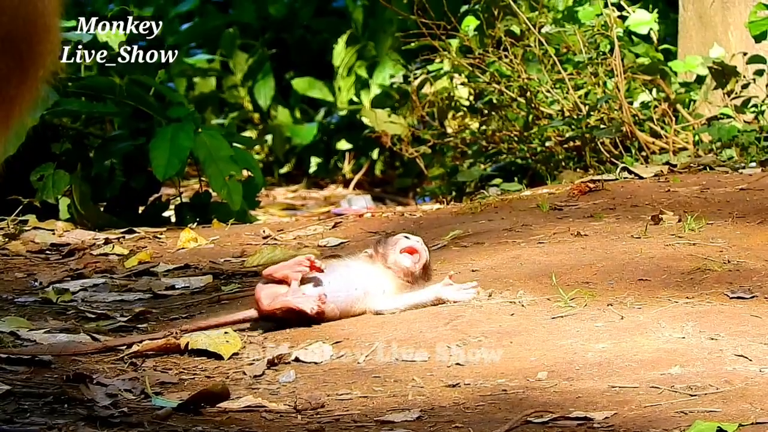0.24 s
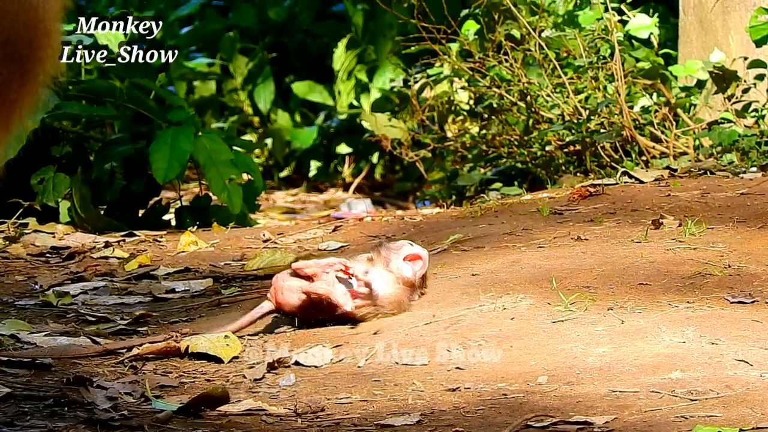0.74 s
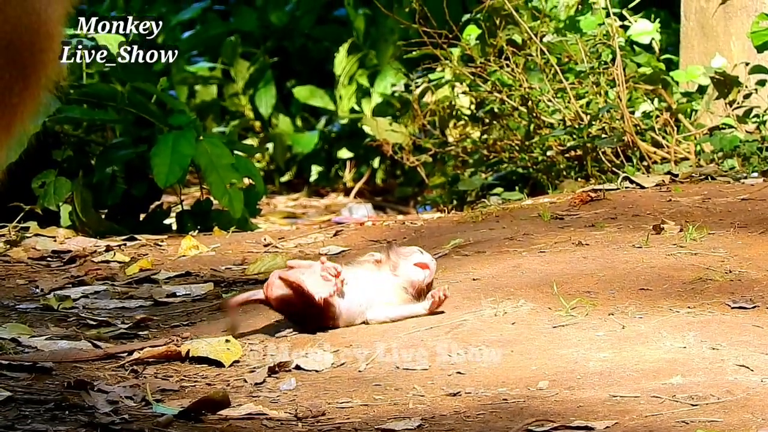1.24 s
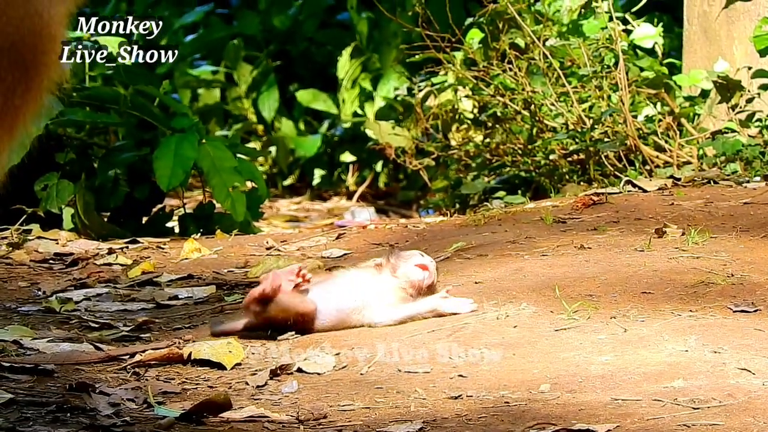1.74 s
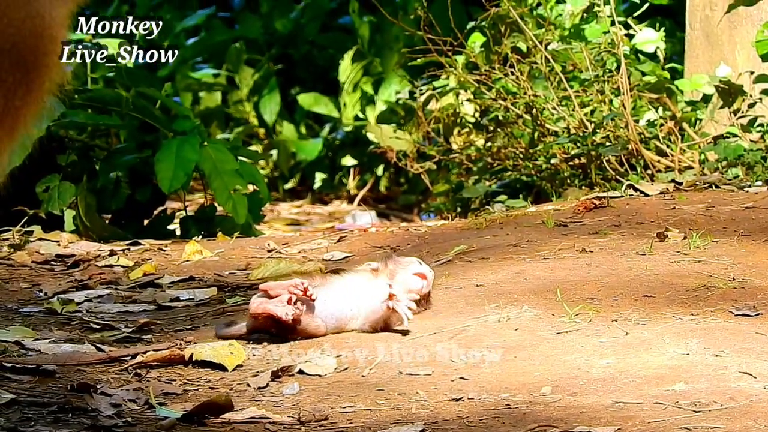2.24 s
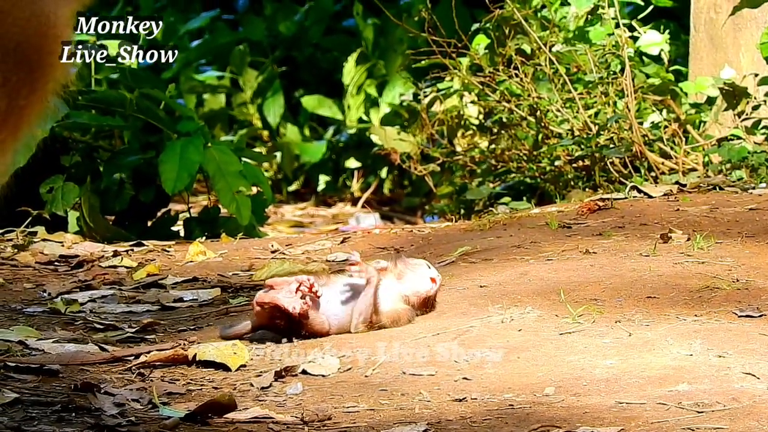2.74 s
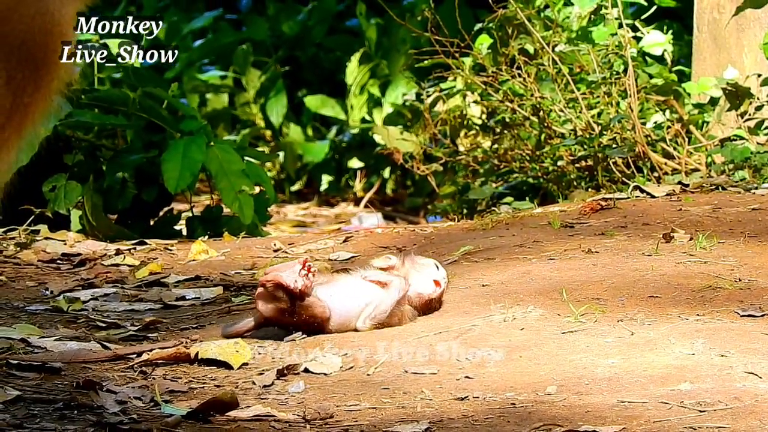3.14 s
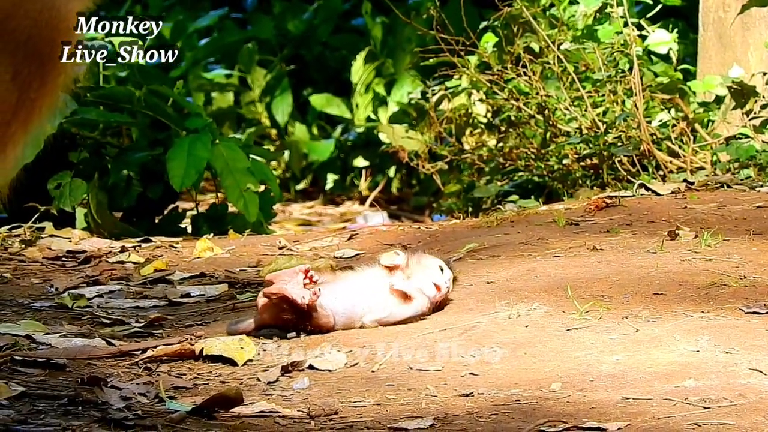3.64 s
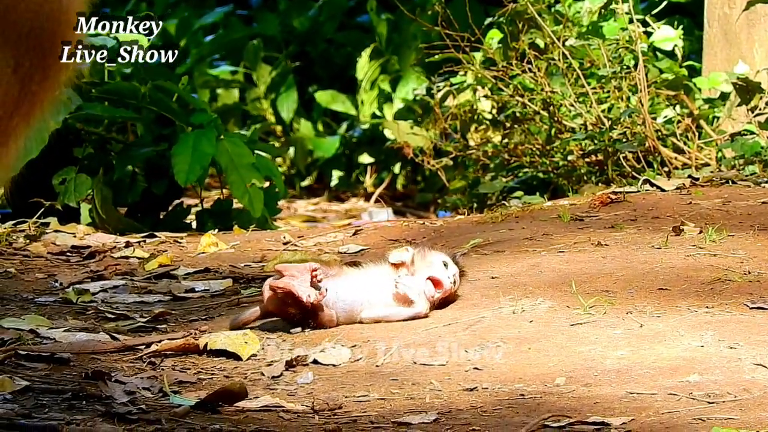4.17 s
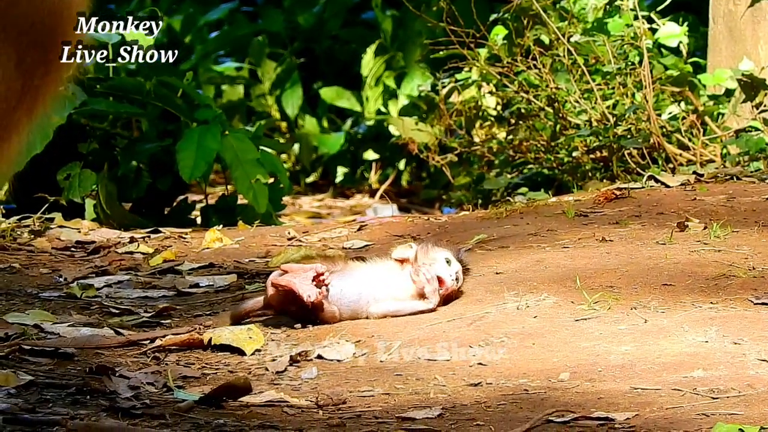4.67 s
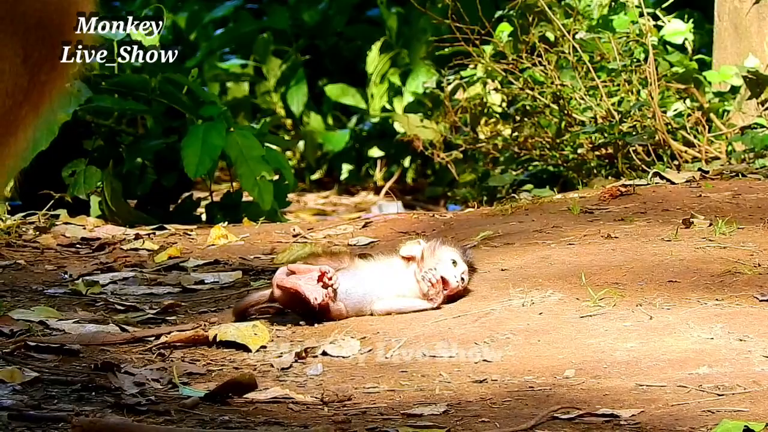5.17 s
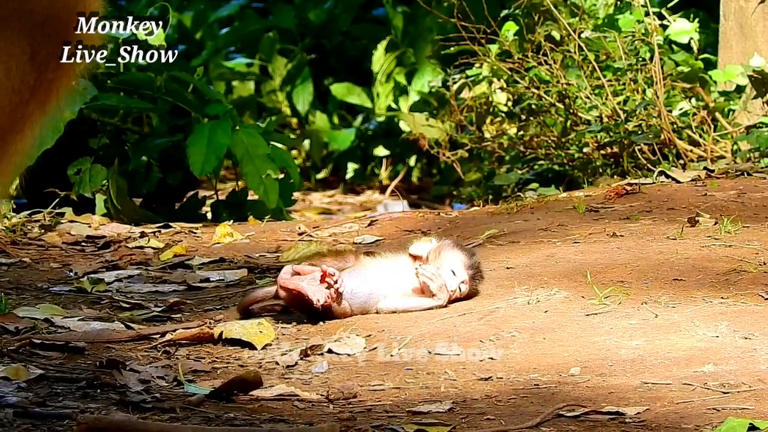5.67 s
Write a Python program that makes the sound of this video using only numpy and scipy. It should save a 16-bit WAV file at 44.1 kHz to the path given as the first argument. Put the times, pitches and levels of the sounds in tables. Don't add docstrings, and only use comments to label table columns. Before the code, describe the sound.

Outdoors by bushes, a small monkey ends one cry, pauses while another coos softly, then gives short barks and five or so piercing screams in quick succession. Each starts low and hoarse, leaps to a whistle and tears into a harsh screech, some ending on a falling note. Scuffs, snaps, low wind and hissing leaves lie beneath. The stereo microphone hears a ringing tree echo, with softened top treble and background dipping under loud cries.

```python
import sys
import numpy as np
from scipy import signal
from scipy.fft import rfft, irfft
from scipy.io import wavfile
from scipy.ndimage import uniform_filter1d

SR = 44100
rng = np.random.default_rng(int(sys.argv[2]) if len(sys.argv) > 2 else 0)


def dump(signal):
    limited = np.clip(np.atleast_2d(signal).T, -1, 1)
    pcm = np.round(limited * 32767).astype(np.int16)
    wavfile.write(sys.argv[1], SR, pcm)


def ratio_of_db(decibels):
    return 10 ** (np.asarray(decibels, float) / 20)


N = 260631


def evened(x):
    return x / np.sqrt(np.mean(x ** 2) + 1e-20)


def read(points, hz):
    f, value = np.transpose(points)
    return np.interp(np.log(hz + 1), np.log(f + 1), value)


def add(mix, s, sound):
    part = mix[round(s * SR):][:len(sound)]
    part += sound[:len(part)]


def played(rows, fade=0.0011):
    s, *columns = np.transpose(rows)
    t = np.arange(s[0], s[-1], 1 / SR)
    since_start = t - s[0] + (s[0] == 0)
    edge = np.clip(np.minimum(since_start, s[-1] - t) / fade, 0, 1)
    return t, [np.interp(t, s, c) for c in columns], edge


def wobble(length, hz):
    noise = rng.standard_normal(length + 2000)
    return evened(signal.lfilter(*signal.butter(2, hz, fs=SR), noise)[2000:])


def resonate(x, hz, width):
    turn = np.exp(2j * np.pi * np.cumsum(hz * np.ones(len(x))) / SR)
    r = np.exp(-np.pi * width / SR)
    return 2 * (turn * signal.lfilter([(1 - r) ** 2], [1, -2 * r, r * r], x / turn)).real


def coloured(x, points):
    return irfft(rfft(x) * ratio_of_db(read(points, np.fft.rfftfreq(N, 1 / SR))), N)


def voiced(rows, throat, order, tilt_db, jitter_hz, shimmer_db, air_db=-40, dips=(), fade=0.0012):
    t, (hz, level_db), edge = played(rows, fade)
    hz = uniform_filter1d(hz, 400, mode="nearest")
    hz = hz * (1 - sum(drop * np.exp(-.5 * ((t - s) / width) ** 2) for s, drop, width in dips))
    turns = np.cumsum(hz + jitter_hz * wobble(len(t), 290)) / SR
    k = np.arange(1, 13)[:, None]
    slope_db = np.minimum(tilt_db, 9)
    share_db = read(throat, k * hz) - read(throat, order * hz) + slope_db * np.log2(k / order)
    harmonics = ratio_of_db(share_db) * (k * hz < 16000) * np.cos(2 * np.pi * k * turns)
    leak = ratio_of_db(air_db) * evened(resonate(rng.standard_normal(len(t)), 0.897 * hz, 1100))
    loudness = np.sqrt(2) * ratio_of_db(level_db + shimmer_db * wobble(len(t), 100))
    return t[0], loudness * edge * (harmonics.sum(0) + leak)


NOTE_PEAK, NOTE_START_DB, NOTE_END_DB = 0.34, -7, -9


def note(start, length, first_hz, last_hz, db, arch):
    u = np.linspace(0, 1, num=20)
    hz = (first_hz + (last_hz - first_hz) * u) * (1 + arch * np.sin(np.pi * u))
    return np.c_[start + length * u, hz, db + np.interp(u, [0, NOTE_PEAK, 1], [NOTE_START_DB, 0, NOTE_END_DB])]


LEAD_S, LEAD_FULL_HZ, LEAD_GONE_HZ = .016, 2400, 2700


def ahead(x):
    hz = np.fft.rfftfreq(N, 1 / SR)
    lead = LEAD_S * np.clip((LEAD_GONE_HZ - hz) / (LEAD_GONE_HZ - LEAD_FULL_HZ), 0, 1)
    return irfft(rfft(x) * np.exp(2j * np.pi * np.cumsum(lead) * hz[1]), N)


def low(rows):
    return rows + [LEAD_S, 0, 0]


def young_one():
    return ahead(whistling() + clean_notes() + chest_voice() + screeching())


KNEE_HZ = 5490
CREEP_HZ_PER_S, WAVER_HZ, DROOP_HZ, DROOP_S = 4200, 54.6, 260, 0.0046
BURST_DB, BURST_S = 6.5, 0.037


def whistle(start, end, top_hz, settle_s, db):
    t = np.linspace(start, end, num=40)
    aim_hz = top_hz - CREEP_HZ_PER_S * (end - t)
    hz = aim_hz - (aim_hz[0] - KNEE_HZ) * np.exp(-(t - start) / settle_s)
    hz -= DROOP_HZ * np.exp((t - end) / DROOP_S)
    waver = wobble(SR // 4, 24)[((t - start) * SR).astype(int)]
    hz += WAVER_HZ * waver * np.minimum((t - start) / settle_s, 1)
    return np.c_[t, hz, db + BURST_DB * np.exp(-(t - start) / BURST_S)]


LEAP_HZ, LEAP_BEND = 2490, 1.3
# f/Hz, level/dB
CLIMB_GAIN = [(1100, -15.5), (1800, -7), (2450, -1), (3000, -6), (4100, 3.5), (5600, -6.5)]


def climb(start, leap, knee, first_hz, db):
    t = np.linspace(start, knee, num=40)
    shot = 1 - np.clip((knee - t) / (knee - leap), 0, 1) ** LEAP_BEND
    hz = np.interp(t, [start, leap], [first_hz, LEAP_HZ]) + (KNEE_HZ - LEAP_HZ) * shot
    return np.c_[t, hz, db + read(CLIMB_GAIN, hz)]


def joined(tables):
    out = [list(tables[0])]
    for rows in tables[1:]:
        if rows[0][0] - out[-1][-1][0] < .002:
            out[-1] = out[-1] + list(rows)
        else:
            out.append(list(rows))
    return out


# start t/s, end t/s, top f/Hz, settling t/s, level/dB
WHISTLES = [
    (0, 0.106, 6150, 0.006, -32.5),
    (2.08, 2.217, 6930, 0.012, -39),
    (2.889, 2.914, 7400, 0.04, -39),
    (3.355, 3.396, 6560, 0.014, -32.5),
    (3.413, 3.553, 7660, 0.00092, -39),
    (4.152, 4.307, 7600, 0.03, -34.5),
    (4.966, 5.146, 7540, 0.065, -40),
    (5.678, 5.926, 7540, 0.035, -35),
]
# start t/s, leap t/s, knee t/s, start f/Hz, level/dB
CLIMBS = [
    (3.275, 3.327, 3.355, 1740, -19),
    (4.085, 4.107, 4.152, 1498, -21.5),
    (4.9, 4.929, 4.966, 1601, -20.5),
    (5.609, 5.644, 5.677, 1101, -26),
]
# start t/s, length t/s, first f/Hz, last f/Hz, level/dB
SQUEAKS = [
    (2.213, 0.062, 7030, 7180, -39),
    (2.836, 0.0285, 3473, 3940, -21.5),
    (3.745, .025, 2557, 2320, -25.5),
    (5.312, 0.04, 2960, 2820, -29.5),
]
# f/Hz, level/dB
THROAT = [(500, -1.5), (900, -6), (1500, 13), (2200, 5), (3000, 5), (4200, -6.5), (5500, -15.5),
          (7500, -35), (10000, -42.5), (14000, -64)]


def whistling():
    out = np.zeros(N)
    arches = [whistle(*row) for row in WHISTLES] + [climb(*row) for row in CLIMBS]
    arches = sorted(arches, key=lambda rows: rows[0, 0])
    for rows in joined(arches) + [note(*row, arch=0.06) for row in SQUEAKS]:
        add(out, *voiced(rows, THROAT, order=1, tilt_db=-7, jitter_hz=50, shimmer_db=3.0, air_db=-15))
    return out


def outburst(start, length, db, first_hz, last_hz):
    t = np.linspace(0, length, num=40)
    attack_s = 0.032
    effort_db = db - 11 * np.clip(1 - t / attack_s, 0, 1) - 17 * np.maximum(t - attack_s, 0) - 150 * t ** 2
    return with_throat(np.c_[start + t, effort_db, first_hz + (last_hz - first_hz) * t / length])


def with_throat(rows):
    t = rows[:, 0] - rows[0, 0]
    return np.c_[rows, np.interp(t, [0, 0.032, 0.1, 0.22], [-14.5, -40.5, -40.5, 1.5])]


THROAT_EVEN_DB, THROAT_SLOPE = -29.5, 0.26


def opening(start, knee, end, db, mouth_hz, end_db):
    effort_db = db + np.array([-18.5, 0, end_db])
    throat_db = THROAT_SLOPE * (THROAT_EVEN_DB - np.maximum.accumulate(effort_db))
    return np.c_[[start, knee, end], effort_db, mouth_hz * np.ones(3), throat_db]


def rough_pulses(t):
    rate, rough = np.full(len(t), 700.), np.ones(len(t))
    for chest in chest_notes():
        s, hz, _ = np.transpose(chest)
        rate = np.where(t > s[0], np.interp(t, s, hz), rate)
        disorder = [.5, .65] if hz[-1] < hz[0] else [.75, .9]
        rough = np.where(t > s[0], np.interp(t, [s[-1] - .025, s[-1]], disorder), rough)
    phase = np.cumsum(rate * (1 + .075 * rough * wobble(len(t), 200))) / SR % 1
    pulses = (np.diff(phase, prepend=0) < 0) * ratio_of_db(2.0 * rough * wobble(len(t), 300))
    puffs = (.5 + np.exp(-phase / 2.8)) * rng.standard_normal(len(t))
    return (1 - .42 * rough) * evened(pulses) + .42 * rough * evened(puffs), phase, rough


def screech(rows, lips_db=0):
    t, (effort_db, mouth_hz, throat_db), edge = played(rows, fade=0.0038)
    drive, phase, rough = rough_pulses(t)
    mouth = resonate(resonate(drive, mouth_hz, 1600), mouth_hz, 2600)
    fresh = np.exp(-(t - t[0]) / 0.07)
    lips_hz = (1.32 + 0.27 * fresh) * mouth_hz
    mouth += ratio_of_db(lips_db - 11.5 + 5.6 * fresh) * resonate(resonate(drive, lips_hz, 1500), lips_hz, 1600)
    hiss_db = -29.5 + 0.74 * (effort_db + 27.5) + 2.4 * wobble(len(t), 45)
    mouth += ratio_of_db(hiss_db) * 4 * fresh * (1 - fresh) * resonate(drive, 8600, 6000)
    unstable = np.cos(2 * np.pi * np.cumsum(mouth_hz * (1 + .04 * wobble(len(t), 40))) / SR)
    chopped = 1 + 1.14 * np.cos(2 * np.pi * phase)
    squeal = rough * unstable * chopped * ratio_of_db(3.7 * wobble(len(t), 73))
    throat_hz = np.interp(t, [t[0], t[0] + 0.079], [2150, 2450])
    throat = resonate(resonate(drive, throat_hz, 1400), throat_hz, 2100)
    if t[-1] < 5.9:
        edge = edge * np.clip((t[-1] - t) / min(.045, .3 * (t[-1] - t[0])), 0, 1)
    upper = evened(.65 * evened(mouth) + .5 * evened(squeal))
    return t[0], ratio_of_db(effort_db) * edge * (upper - ratio_of_db(np.minimum(throat_db, 16)) * evened(throat))


# t/s, effort level/dB, mouth f/Hz
FIRST_SCREECH = [
    (0.094, -40, 5700),
    (0.119, -23, 5400),
    (0.167, -12.5, 4350),
]
# start t/s, length t/s, effort level/dB, first mouth f/Hz, last mouth f/Hz
SCREECHES = [
    (2.247, 0.2, -16.5, 4332, 3126),
    (3.384, 0.03, -25, 4350, 4300),
    (3.542, 0.22, -17, 4285, 3500),
    (4.295, 0.24, -18.5, 3880, 3700),
    (5.149, 0.089, -16, 3785, 3580),
    (5.89, .025, -16.5, 3950, 3900),
]
# start t/s, knee t/s, end t/s, effort level at the knee/dB, mouth f/Hz
BARKS = [
    (1.376, 1.399, 1.428, -33.5, 3705),
    (1.487, 1.489, 1.56, -36.5, 3800),
    (1.822, 1.859, 1.89, -26.5, 3714),
    (1.93, 1.951, 1.982, -24, 4010),
    (2.779, 2.813, 2.86, -26, 4220),
    (5.548, 5.591, 5.635, -33, 4200),
]
GROWLS = [
    (3.247, 3.261, 3.322, -34, 4370),
    (4.028, 4.067, 4.13, -26.5, 3900),
    (4.861, 4.923, 4.945, -22.5, 3720),
]


def screeching():
    out = np.zeros(N)
    harsh = [opening(*row, end_db=-12.5) for row in BARKS] + [opening(*row, end_db=11) for row in GROWLS]
    for rows in harsh + [with_throat(np.array(FIRST_SCREECH))]:
        add(out, *screech(rows, lips_db=-12))
    for row in SCREECHES:
        add(out, *screech(outburst(*row)))
    return out


# start t/s, length t/s, first f/Hz, last f/Hz, level/dB
GRUNTS = [
    (1.361, 0.058, 717, 764, -33),
    (1.469, 0.044, 840, 866, -42),
    (1.8, 0.06, 700, 963, -35.5),
    (2.767, 0.033, 749, 955, -36.5),
    (3.226, 0.043, 591.6, 924.5, -34.5),
    (3.369, 0.041, 752, 757, -44),
    (4.01, 0.066, 643.3, 970, -39),
    (4.853, 0.039, 693.5, 993, -38),
    (5.529, 0.074, 602, 1026, -36.5),
]
# start t/s, length t/s, first f/Hz, level/dB
BREAKS = [
    (0.09, 0.074, 700, -50),
    (2.23, 0.065, 930.4, -43),
    (3.525, 0.054, 875, -40.5),
    (4.279, 0.058, 873, -40),
    (5.131, 0.06, 827, -43),
    (5.877, 0.049, 904, -42.5),
]


def chest_notes():
    grunts = [note(*row, arch=.13) for row in GRUNTS]
    sag = 4500
    sagging = [note(s, length, hz, hz - sag * length, db, 0.07) for s, length, hz, db in BREAKS]
    return sorted(map(low, grunts + sagging), key=lambda rows: rows[0, 0])


# f/Hz, level/dB
CHEST = [(500, -1.5), (900, -4), (1500, -6), (2200, -3.5), (3000, -17.5), (4300, -10.5), (6000, -29.5),
         (10000, -63)]


def chest_voice():
    out = np.zeros(N)
    for rows in chest_notes():
        add(out, *voiced(rows, CHEST, order=1, tilt_db=-2.5, jitter_hz=36.0, shimmer_db=3.5, fade=0.0092))
    return out


# start t/s, length t/s, first f/Hz, last f/Hz, level/dB
YELPS = [
    (1.911, 0.055, 2207, 2332, -23),
]
WHINES = [
    (1.826, 0.058, 1662, 1640, -30.5),
    (2.77, 0.049, 2154, 2210, -27.5),
    (2.81, 0.036, 2354, 2678, -22),
    (4.025, 0.049, 1790, 2150, -24.5),
    (4.868, 0.059, 1750, 2140, -32.5),
    (5.532, 0.082, 1800, 2110, -33),
]
# t/s, f/Hz, level of the second harmonic/dB
ENDINGS = [
    [(0.152, 1580, -31), (0.157, 1522, -25.5), (0.183, 1410, -29), (0.189, 1230, -42), (0.196, 1148, -41)],
    [(3.68, 2640, -61), (3.705, 2208, -44), (3.726, 1790, -35.5), (3.756, 1615, -36.5), (3.77, 1600, -40)],
    [(4.395, 1950, -35.5), (4.42, 2153, -18), (4.436, 2120, -20), (4.45, 1750, -22.5), (4.466, 1370, -31.5),
     (4.5, 1290, -24.5), (4.522, 1287, -29.5)],
    [(5.215, 2149, -43), (5.227, 2090, -26.5), (5.25, 1700, -22), (5.265, 1519, -21), (5.292, 1480, -29),
     (5.313, 1314, -29)],
]
ENDING_TILTS = [14, -8.5, -3, -1]
ENDING_JITTERS_HZ = [12, 18, 45, 12]
# f/Hz, level/dB
OPEN_THROAT = [(1250, -31), (1600, -19), (2100, -15), (2700, -1), (4300, 1), (5600, -24), (8000, -46),
               (12000, -65)]


def clean_notes():
    out = np.zeros(N)
    for row in YELPS:
        rows = low(note(*row, arch=-0.0194))
        add(out, *voiced(rows, OPEN_THROAT, order=1, tilt_db=-13, jitter_hz=45.4, shimmer_db=4.5, fade=.003))
    for row in WHINES:
        rows = low(note(*row, arch=0.0279))
        add(out, *voiced(rows, OPEN_THROAT, order=1, tilt_db=-25, jitter_hz=70, shimmer_db=4.5, fade=0.0095))
    for rows, tilt_db, jitter_hz in zip(ENDINGS, ENDING_TILTS, ENDING_JITTERS_HZ):
        add(out, *voiced(rows, OPEN_THROAT, order=2, tilt_db=tilt_db, jitter_hz=jitter_hz, shimmer_db=2.5))
    return out


# t/s, peak level/dB, treble against it level/dB
SNAPS = [(2.0807, -40.5, 11), (2.9132, -29, -16), (3.5964, -30, -7), (3.6666, -41, -6),
         (3.748, -39.5, 10.5), (4.088, -60, -17), (4.583, -66.5, -26), (4.933, -47, -19.5),
         (5.201, -53, -25), (5.4177, -46, -5)]


def snaps():
    out, t = np.zeros(N), np.arange(400) / SR
    for s, db, treble_db in SNAPS:
        crack = rng.standard_normal(400) * np.exp(-t / 0.00096)
        add(out, s, ratio_of_db(db + 2.5) * (crack + ratio_of_db(treble_db) * np.diff(crack, prepend=0)))
    return out


# t/s, peak level/dB, centre f/Hz, time to die by 60 dB t/s
SCUFFS = [(0.479, -40.5, 960, 0.03), (0.8, -41, 780, 0.11), (0.823, -41.5, 865, 0.16),
          (0.938, -34.5, 703.5, 0.063), (1.335, -41, 1570, 0.21), (1.545, -37, 1540, 0.083),
          (1.591, -38.5, 1490, 0.042), (1.699, -36, 1610, 0.066), (1.894, -30, 3820, 0.068),
          (2.17, -39.5, 405, 0.13), (2.548, -41, 1800, 0.3), (2.847, -36, 247, 0.066),
          (2.908, -29, 223, 0.057), (3.912, -31.5, 563, 0.087), (4.588, -29.5, 365, 0.11),
          (4.838, -35, 792, 0.16), (5.424, -29.5, 840, 0.06), (5.446, -24, 283, 0.062)]


def scuffs():
    out, t = np.zeros(N), np.arange(5000) / SR
    for s, db, hz, t60 in SCUFFS:
        puff = evened(resonate(rng.standard_normal(len(t)), hz, 0.76 * hz)) + 0.13 * rng.standard_normal(len(t))
        add(out, s, ratio_of_db(db - 3.5 - 60 * t / np.clip(t60, .01, .4)) * np.minimum(t / 0.0016, 1) * puff)
    return out


# t/s, f/Hz, level of the second harmonic/dB
COO = [
    (.51, 376.3, -53.5),
    (.595, 498, -45),
    (.72, 433, -47.5),
    (.765, 455.4, -45),
    (.795, 398, -48.5),
    (.93, 487.7, -47),
    (1.05, 503, -47),
    (1.17, 640, -49),
    (1.255, 577, -57),
]
# t/s, pitch drop as a share 0-1, width t/s
HICCUPS = [
    (.88, 0.19, 0.011),
    (.948, 0.25, .012),
    (1.066, .1, 0.00977),
    (1.133, 0.3, 0.014),
]
# f/Hz, level/dB
COO_THROAT = [(300, -7.5), (500, -0.5), (1000, 3), (1500, -10.5), (2000, -11.5), (2500, -5.5),
              (3300, -11.5), (7000, -42)]


def coo():
    out = np.zeros(N)
    add(out, *voiced(COO, COO_THROAT, order=2, tilt_db=-4.5, jitter_hz=14, air_db=-36.0, dips=HICCUPS,
                     shimmer_db=4.0, fade=.03))
    return out


# f/Hz, t/s
TREES = [(500, 0.84), (1500, 0.22), (2600, 0.84), (4000, 0.72), (7000, 1.5), (12000, 1)]
# f/Hz, level/dB
ECHO_COLOUR = [(500, 1), (1500, -11), (2500, 2.5), (4000, 0.5), (6000, -14.5), (9000, -7.5), (14000, -33.5)]


def trees(x, same):
    taps = np.zeros((2, SR))
    at = np.arange(300, SR - 20, 20) + rng.integers(0, 20, (2, (SR - 301) // 20))
    np.put_along_axis(taps, at, rng.choice([-1., 1.], at.shape), 1)
    taps[1] = same * taps[0] + np.sqrt(1 - same ** 2) * taps[1]
    hz, t, z = signal.stft(taps, SR, nperseg=256)
    decay_db = read(ECHO_COLOUR, hz)[:, None] - 60 * t / read(TREES, hz)[:, None]
    tail = signal.istft(z * ratio_of_db(decay_db), SR, nperseg=256)[1]
    tail = tail / np.linalg.norm(tail[0])
    before = np.arange(N) < .412 * SR
    first, later = [signal.fftconvolve((x * part)[None], tail, axes=1)[:, :N] for part in (before, ~before)]
    return first * before + later


def ducking(x):
    power_db = 10 * np.log10(abs(uniform_filter1d(x ** 2, size=2000)) + 1e-12)
    fall = np.arange(N) * 111 / SR
    over_db = np.maximum(np.maximum.accumulate(power_db + fall) - fall + 25, 0)
    return ratio_of_db(-uniform_filter1d(over_db, size=600))


# t/s, level/dB
GUSTS = [(0, 2.5), (.36, -2), (0.563, 3.5), (.9, -1), (1.45, 4), (1.74, 0.5), (2.07, 7.5), (2.45, 2.5),
         (3.3, 1.5), (3.97, 2), (4.6, 8), (5.1, 1.5), (5.46, 4.5), (5.91, 2.5)]
# f/Hz, share 0-1
SAME = [(60, 1), (210, 0.89), (700, 0.85), (2400, 0.59), (8200, 0.07)]


def air(spectrum, db, ref_band):
    frames, hz = N // 256 + 5, np.fft.rfftfreq(2048, 1 / SR)
    a, b, c, d, patches = rng.standard_normal((frames // 2 + 4, 1025, 5)).T
    patches = evened(uniform_filter1d(uniform_filter1d(patches, 12, 0), 5, 1))
    same, left = np.clip(read(SAME, hz), -1, 1)[:, None], a + 1j * b
    z = np.array([left, same * left + np.sqrt(1 - same ** 2) * (c + 1j * d)])
    shape = ratio_of_db(read(spectrum, hz))
    inside = (hz > ref_band[0]) & (hz < ref_band[1])
    z = z * shape[:, None] * ratio_of_db(2.5 * patches)
    x = evened(signal.istft(z, nperseg=2048, noverlap=1536)[1][:, :N])
    level_db = db + np.interp(np.arange(N) / SR, *np.transpose(GUSTS))
    return x * ratio_of_db(level_db) * np.linalg.norm(shape) / np.linalg.norm(shape[inside])


# f/Hz, level per Hz/dB
HISS = [(71, -58.5), (120, -2.5), (178, -9), (612, -11.5), (1010, -17.5), (1250, -17), (3170, -11.5),
        (3600, -11.5), (4010, -8), (4460, -17), (8650, -36), (11200, -38), (19000, -120)]


def leaves():
    return air(HISS, db=-60, ref_band=(200, 650))


# f/Hz, level per Hz/dB
RUMBLE = [(12, -44.5), (20, -14), (38, 6.5), (52, 8.5), (121, 0), (157, -34), (179, -43.5), (260, -15),
          (340, -56), (570, -120)]


def wind():
    return air(RUMBLE, db=-47.5, ref_band=(30, 160))


# start t/s, end t/s, first firing f/Hz, last firing f/Hz, level/dB
MOTOR = [
    (1.221, 1.729, 113.6, 83.2, -52),
    (1.673, 2.196, 97.3, 95.2, -47),
    (2.375, 2.64, 98.5, 103.6, -41),
    (2.831, 2.904, 101, 101, -36.5),
]


def motor():
    out = np.zeros(N)
    for start, end, first_hz, last_hz, db in MOTOR:
        t, (hz, level_db), edge = played([(start, first_hz, db), (end, last_hz, db)], fade=0.042)
        turns = 2 * np.pi * np.cumsum(hz) / SR
        orders = np.sin(turns) + ratio_of_db(-13.5) * np.sin(2 * turns)
        orders += ratio_of_db(-31.5) * np.sin(3 * turns) + ratio_of_db(-20.5) * np.sin(4 * turns)
        add(out, t[0], np.sqrt(2) * ratio_of_db(level_db + 5.95 * wobble(len(t), 15.2)) * edge * orders)
    return out


def scene():
    near = young_one() + snaps() + scuffs()
    bounce = resonate(np.roll(near, 75), 6200, 8000) * np.array([[1], [-1]])
    voices = near + ratio_of_db(-7.5) * bounce + coo() + motor()
    echo = ratio_of_db(-16) * trees(near, same=0.55)
    return voices + echo + ducking(near) * (wind() + leaves())


def low_pass(x):
    return signal.sosfilt(signal.butter(12, 15500, fs=SR, output="sos"), x)


# f/Hz, level/dB
LEAN = [(60, -1.2), (1000, -.3), (4000, -1.0), (12000, -.5)]
# f/Hz, level/dB
MICROPHONE = [(20, 0), (6500, 0), (8000, -5), (10000, -15), (12000, -27), (16000, -40)]


def record(dry):
    lean = np.array(LEAN)
    sides = [coloured(dry[0], lean * [1, .5]), coloured(dry[1], lean * [1, -.5])]
    mix = coloured(np.array(sides), MICROPHONE)
    return low_pass(mix)


dry = scene()
out = record(dry)
dump(out)
```